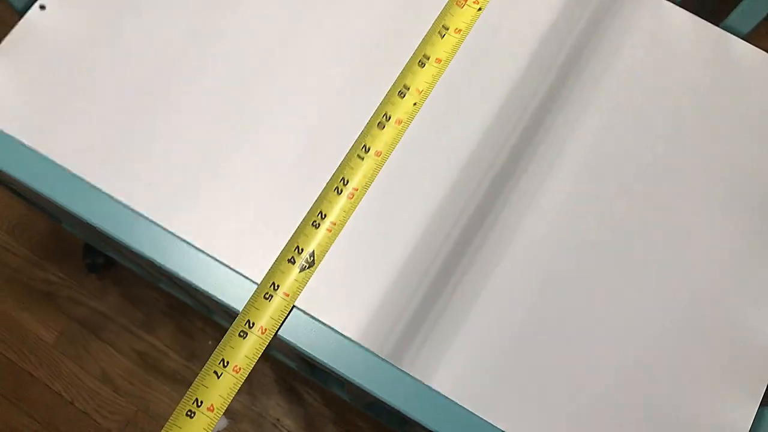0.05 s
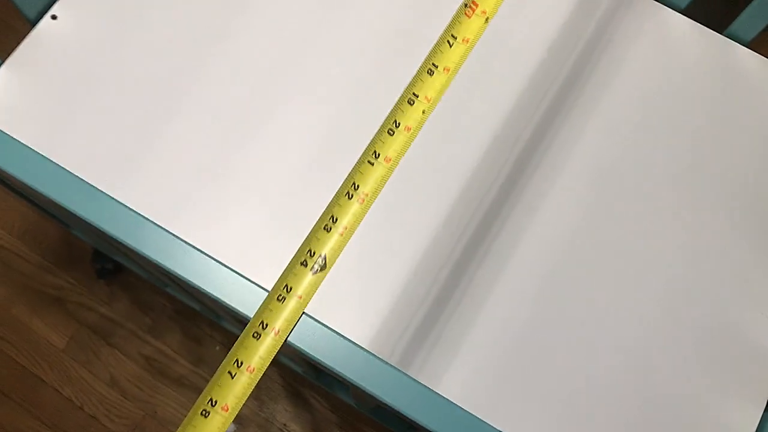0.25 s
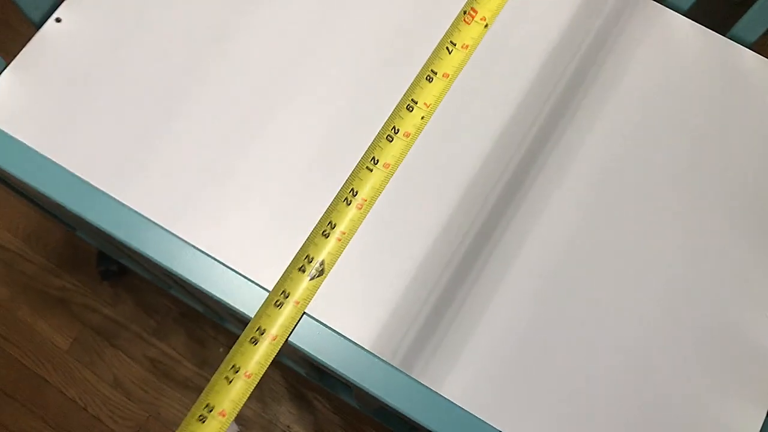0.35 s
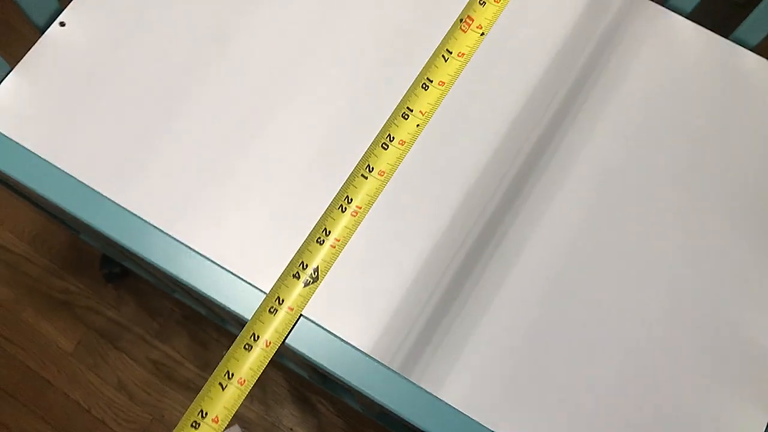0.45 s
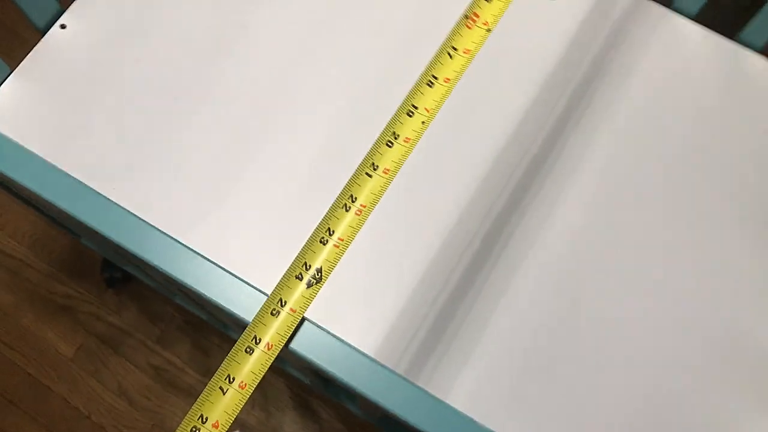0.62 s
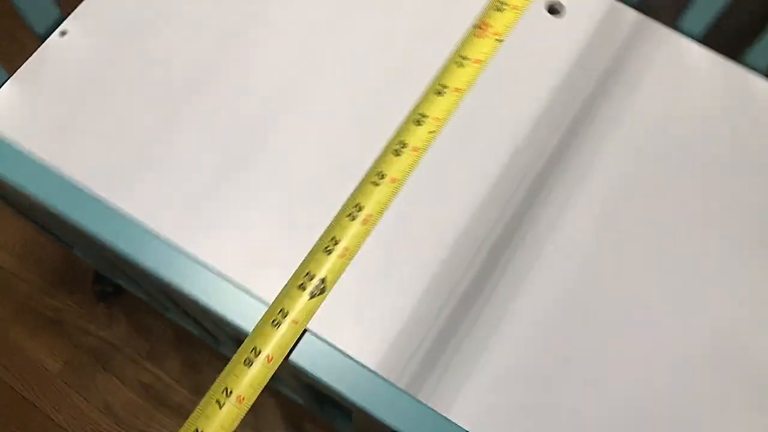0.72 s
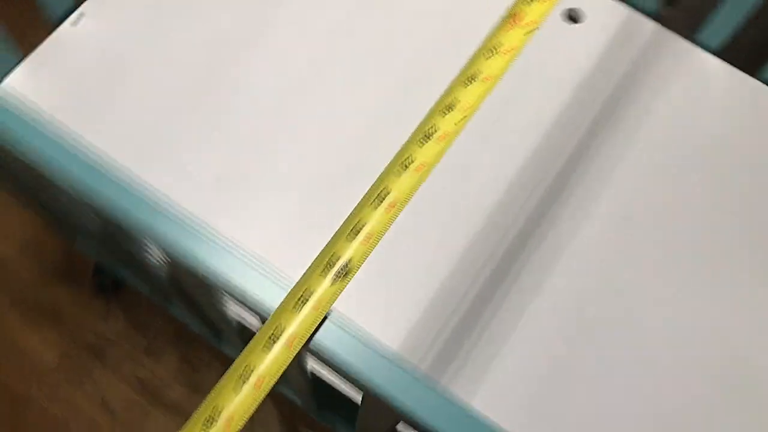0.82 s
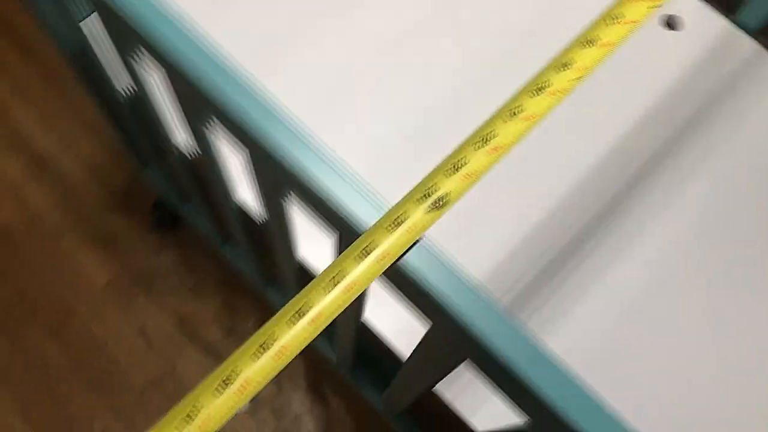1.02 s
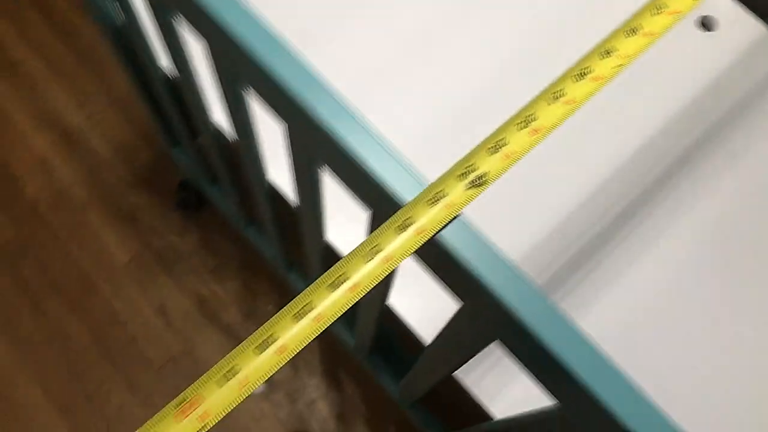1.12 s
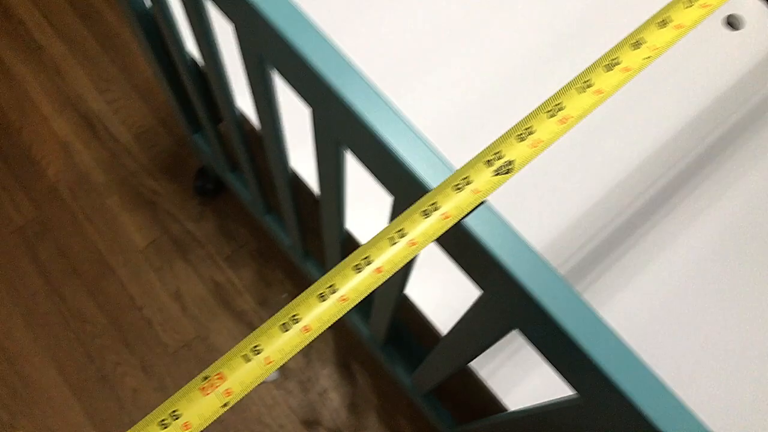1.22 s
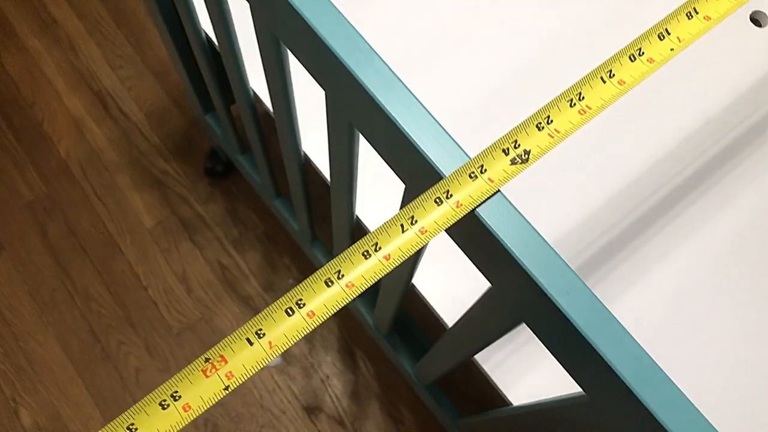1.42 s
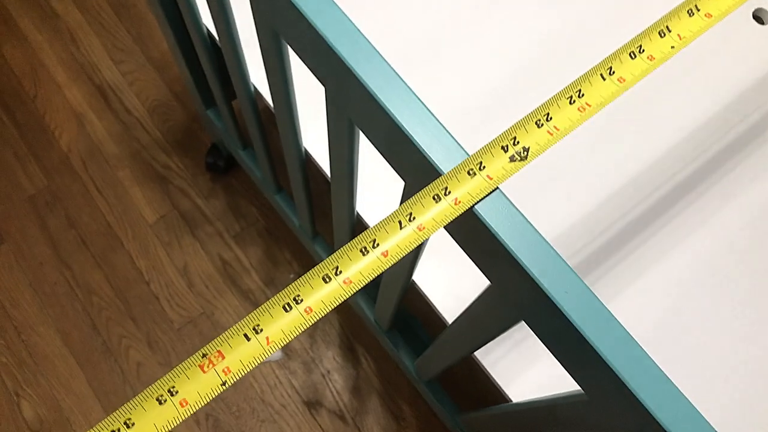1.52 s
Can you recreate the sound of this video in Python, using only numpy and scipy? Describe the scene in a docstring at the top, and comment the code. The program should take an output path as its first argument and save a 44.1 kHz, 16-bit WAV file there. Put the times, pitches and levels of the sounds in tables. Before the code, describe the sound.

Thin steel tape measure rattles, then clicks, scrapes and slides against a wooden rail.

```python
"""Steel tape measure on a wooden rail.

Close up in a quiet room, the thin blade buckles and clatters, then is stilled by a soft bump.
It clicks on the rail and scrapes along it with small ticks, and a short stick-slip rasp follows
as it is drawn out. Handling rumble and a faint electrical buzz lie underneath."""
import sys
import numpy as np
from scipy import signal
from scipy.fft import rfft, irfft, next_fast_len
from scipy.io import wavfile

SR = 44100
rng = np.random.default_rng(int(sys.argv[2]) if len(sys.argv) > 2 else 0)


def put_to_file(sound):
    """Save the sound as 16-bit audio at rate SR, in the file named by the first command-line argument."""
    columns = np.atleast_2d(sound).T  # one column per channel
    safe = np.clip(columns, -1, 1)
    whole_steps = np.round(safe * 32767)
    wavfile.write(sys.argv[1], SR, whole_steps.astype(np.int16))


N = 68355
T = np.arange(N) / SR


def amp(db):
    """Decibels to gain."""
    return 10 ** (np.asarray(db) / 20)


def unit(x):
    """Scale to rms 1."""
    return x / np.sqrt(np.mean(x ** 2) + 1e-20)


def curve_at(points, hz):
    """Read (frequency [Hz], value) points on a log frequency axis."""
    freqs, values = np.transpose(points)
    return np.interp(np.log(hz + 1), np.log(freqs), values)


def fader(points, t=T):
    """Gain over time from (time [s], level [dB]) points."""
    return amp(np.interp(t, *np.transpose(points)))


def filtered(x, response):
    """Apply a gain that depends on frequency."""
    size = next_fast_len(len(x) + 8192)
    return irfft(rfft(x, size) * response(np.fft.rfftfreq(size, 1 / SR)), size)[:len(x)]


def noise(spectrum, size=N):
    """Coloured noise of rms 1."""
    return unit(filtered(rng.standard_normal(size), lambda hz: amp(curve_at(spectrum, hz))))


def add(track, start, sound):
    """Mix a sound into the track at a start time in seconds."""
    i = max(round(start * SR), 0)
    track[i:i + len(sound)] += sound[:N - i]


def burst(spectrum, t60):
    """A crowd of modes struck at once, all dying at one speed."""
    t = T[:SR // 5]
    attack = 1 - np.exp(-t / 0.000078)
    return noise(spectrum, size=len(t)) * amp(-60 * t / t60) * attack


def ring(spectrum, decays):
    """A crowd of modes, each frequency dying at its own speed."""
    hz, t, bands = signal.stft(noise(spectrum, size=SR // 2), SR, nperseg=256)
    decay = amp(-60 * t / curve_at(decays, hz)[:, None])
    tail = signal.istft(bands * decay, SR, nperseg=256)[1]
    return tail * (1 - np.exp(-T[:len(tail)] / 0.00091))


def modes(table, waver_hz=18.3, wavers_per_s=70):
    """Struck modes of unit strength, each wavering in pitch as the blade bends."""
    t = T[:SR // 2]
    hz, db, t60 = np.transpose(table)[:, :, None]
    bends = rng.standard_normal((len(hz), 256))
    waver = waver_hz * np.array([np.interp(t * wavers_per_s, np.arange(256), bend) for bend in bends])
    cycles = np.cumsum(hz + waver, axis=1) / SR + rng.random(hz.shape)
    partials = amp(db - 60 * t / t60) * np.sin(2 * np.pi * cycles)
    attack = 1 - np.exp(-t / 0.0005)
    return partials.sum(0) / np.sqrt(np.sum(amp(db) ** 2) / 2) * attack


def snap(spectrum, travel_s=0.001, at_hz=4057):
    """One bending wave travelling along the blade: the treble runs ahead of the bass."""
    hz = np.fft.rfftfreq(SR // 10, 1 / SR)
    lag_cycles = 2 * travel_s * np.sqrt(at_hz * hz)
    wave = irfft(amp(curve_at(spectrum, hz)) * np.exp(-2j * np.pi * lag_cycles))
    return wave * np.linspace(1, 0, len(wave)) / np.abs(wave).max()


# colour of the room tone (frequency [Hz], gain [dB])
AIR_EQ = [(30, 8), (95, 14.5), (135, 7), (200, -0.5), (300, 2.5), (400, -3.5), (720, -10), (1000, -8),
          (1250, -13.5), (1800, -2.5), (2200, -22.5), (3000, -15), (4500, -21.5), (6500, -15.5),
          (10300, -27.5), (12000, -23), (15500, -26)]
# steady hum tones (frequency [Hz], level [dB])
HUM_TONES = [(323, -88), (398, -72.5)]


def room_tone():
    """A bed of quiet air and faint hum."""
    hum = sum(amp(db) * np.sin(2 * np.pi * hz * T) for hz, db in HUM_TONES)
    return amp(-60.5) * noise(AIR_EQ) + hum


# colour of the buzz's spits (frequency [Hz], gain [dB])
SPIT_EQ = [(1000, 2), (3000, -1.5), (4600, -9), (5400, 8), (6600, -3.5), (7600, -20), (10000, -24.5),
           (15000, -8)]


def mains_buzz(mains_hz=60, spit_width_s=0.00083, whine_hz=8360, whine_lag_s=0.014):
    """One spit of noise in every mains cycle, and a rough whine that pulses with it."""
    from_spit = ((T * mains_hz + 0.5) % 1 - 0.5) / mains_hz
    spits = np.exp(-(from_spit / spit_width_s) ** 2 / 2) * noise(SPIT_EQ)
    phase_jitter = 0.5 * noise([(150, 1.5), (2000, -72)])
    whine = unit(np.sin(2 * np.pi * whine_hz * T + phase_jitter))
    pulsing = np.clip(0.62 + np.cos(2 * np.pi * mains_hz * (T - whine_lag_s)), 0, 1)
    return amp(-62.5) * spits + amp(-77) * whine * pulsing


# swells of the deep rumble and of the hand's rub (time [s], level [dB])
RUMBLE_FADER = [(0, -43.5), (.1, -48.5), (.16, -57.5), (.3, -46), (.45, -58.5), (.52, -38), (.61, -54.5),
                (.68, -33.5), (.74, -53), (.83, -42), (.96, -42.5), (1.09, -48.5), (1.2, -49.5),
                (1.29, -45), (1.55, -52.5)]
RUB_FADER = [(0, -93), (.44, -86), (.52, -71), (.61, -62.5), (.66, -60), (.75, -74.5), (.86, -58),
             (.885, -43.5), (.94, -56), (.98, -44), (1.025, -50), (1.045, -66.5), (1.55, -75)]
# their colours (frequency [Hz], gain [dB])
RUMBLE_EQ = [(15, -8.5), (28, 0.5), (43, 2), (60, 1), (80, -15.5), (130, -21), (200, -45.5), (500, -64)]
RUB_EQ = [(50, -3.5), (130, -0.5), (200, -4.5), (330, -6.5), (500, -19.5), (750, -25), (2000, -55)]


def handling():
    """The moving hand rumbles and rubs near the microphone."""
    return fader(RUMBLE_FADER) * noise(RUMBLE_EQ) + fader(RUB_FADER) * noise(RUB_EQ)


# swell of the scrape (time [s], level [dB])
SCRAPE_FADER = [(0, -73), (.17, -74.5), (.22, -65), (.42, -60.5), (.45, -48.5), (.5, -55.5), (.55, -57),
                (.61, -57.5), (.7, -63.5), (.79, -70.5), (.9, -68), (1, -79.5), (1.55, -78.5)]
# its broad colour (frequency [Hz], gain [dB])
SCRAPE_EQ = [(200, 0), (800, -12), (1600, -3.5), (2300, -3), (3100, -6.5), (3700, -6), (4600, -3.5),
             (5600, 0), (7000, -20), (10000, -30), (15000, -34)]
# resonances of the resting blade (frequency [Hz], width [Hz], boost [dB])
SCRAPE_PEAKS = [(1550, 15, 20.5), (1790, 57, 2), (3580, 81, 15), (4230, 58, 6)]


def scrape(grains_per_s=7400, spread_db=2.5):
    """Dense friction grains excite the blade as its edge slides on the rail."""
    def body(hz):
        peaks = sum(db / (1 + (2 * (hz - centre) / width) ** 2) for centre, width, db in SCRAPE_PEAKS)
        return amp(curve_at(SCRAPE_EQ, hz) + peaks)

    grains = (rng.random(N) < grains_per_s / SR) * rng.standard_normal(N)
    grains *= amp(spread_db * rng.standard_normal(N))
    return fader(SCRAPE_FADER) * unit(filtered(grains, body))


# light touches on the rail (time [s], level [dB], brightness [dB/octave])
TICK_CUES = [(0.057, -59.5, 11), (0.0793, -53, 5.5), (0.4716, -41, 3.5), (0.5312, -43, 0.5),
             (0.536, -65, -15), (.5607, -55, -22), (0.5874, -47, -4.5), (.621, -51, 15), (.670, -56, 5),
             (0.7237, -52, -2), (1.0971, -56, -10), (1.1, -58.5, 16), (1.282, -62.5, -7),
             (1.338, -57, -11.5)]
# a tick's colour before its tilt (frequency [Hz], gain [dB])
TICK_EQ = [(200, -34), (900, -13.5), (1600, 2.5), (2600, -1), (3700, 6), (4600, 1.5), (5600, -2.5),
           (6600, -9), (10000, -38), (15000, -45)]


def ticks():
    """The blade touches the rail lightly: each tick is a short hit with a softer tail."""
    out = np.zeros(N)
    for start, db, tilt in TICK_CUES:
        colour = [(hz, band_db + tilt * np.log2(hz)) for hz, band_db in TICK_EQ]
        add(out, start, amp(db) * (burst(colour, t60=0.042) + amp(-13.5) * burst(colour, t60=0.2)))
    return out


# hits of the buckling blade (time [s], blade level [dB], rail knock level [dB])
CLATTER_CUES = [(0.2307, -19.5, -37), (0.2329, -19, -30.5), (0.2369, -24, -26.5), (0.2403, -21, -35),
                (0.2463, -32.5, -52), (0.2661, -25.5, -32.5), (0.2729, -33.5, -40), (.291, -33, -52),
                (0.3065, -30.5, -58), (0.3286, -45.5, -45.5), (0.387, -48, -64)]
# modes of the free blade and of the knock on the rail (frequency [Hz], gain [dB], t60 [s])
BLADE_MODES = [(3627, -5.5, 0.49), (3845, 1, 0.11), (3920, -17, .35), (4087, 7.5, 0.16), (4157, -2, 0.31),
               (4570, -10, 0.21), (4690, -8, 0.2), (4753, -14, 0.31), (4800, 2, 0.16), (5370, 0.5, 0.31),
               (5650, -15, .3), (5840, 0, 0.15), (6912, 2.5, .2), (8000, -17, .25)]
KNOCK_MODES = [(333, -32, 0.083), (480, -13.5, 0.17), (1293, -12.5, .3), (1360, -13.5, 0.059),
               (1716, 4.5, 0.033), (1715, 4, 0.06), (1780, -2.5, 0.047), (2400, -0.5, 0.046),
               (3034, 11, 0.033), (3130, -2, 0.088)]
# colours of the opening crack and of the shimmer of weaker modes (frequency [Hz], gain [dB])
CRACK_EQ = [(200, -17.5), (450, -10), (900, -21.5), (1600, -12), (2600, -9), (4200, 0.5), (6500, 2.5),
            (8000, -8), (10500, -15), (12500, -11.5), (15500, -21)]
SHIMMER_EQ = [(90, -20.5), (140, -9.5), (220, -26.5), (450, -26.5), (850, -22), (1600, -12), (2300, -15),
              (3300, -9.5), (4000, -5.5), (5300, 3.5), (6600, -7), (7600, -9), (9600, -16.5),
              (10500, -26.5), (12500, -24.5), (15500, -31)]
# how long the shimmer hangs on (frequency [Hz], t60 [s])
SHIMMER_DECAY = [(200, 0.64), (1500, 0.4), (5000, 0.3), (9000, 0.28), (15000, 0.37)]


def clatter(settle_at_s=0.35, settle_length_s=0.04, settle_db=-3.5):
    """Every hit cracks, knocks the rail and rings the thin steel anew, damped as the blade settles."""
    out = np.zeros(N)
    for start, db, knock_db in CLATTER_CUES:
        add(out, start, amp(db - 9) * modes(BLADE_MODES))
        add(out, start, amp(knock_db) * modes(KNOCK_MODES))
        add(out, start, amp(db + 1.5) * snap(CRACK_EQ))
        add(out, start, amp(db) * burst(CRACK_EQ, t60=0.025))
        add(out, start, amp(db - 9) * ring(SHIMMER_EQ, SHIMMER_DECAY))
    settled = np.clip((T - settle_at_s) / settle_length_s, 0, 1)
    return out * amp(settle_db * settled)


# jolts that set the blade flapping (time [s], level [dB], pitch [Hz])
FLAP_CUES = [(.24, -47.5, 158), (0.489, -44.5, 148.2)]


def flaps(rise_s=0.017, t60=0.36):
    """The long free blade swings after a jolt: a low tone that swells and dies."""
    out = np.zeros(N)
    swell = 1 - np.exp(-T / rise_s)
    for start, db, hz in FLAP_CUES:
        add(out, start, amp(db - 60 * T / t60) * swell * np.sin(2 * np.pi * hz * T))
    return out


# soft bumps (time [s], level [dB], pitch [Hz], width [s])
BUMP_CUES = [(0.3587, -25, 352, 0.0008), (.366, -34.5, 67, 0.0053), (0.9517, -50, 1000, 0.0013),
             (1.031, -33, 94, 0.0041), (1.098, -54.5, 245, 0.0028), (1.339, -43.5, 900, 0.00023),
             (1.4785, -52.5, 950, 0.00058)]


def bumps():
    """Soft contacts: a push of a cycle or two with no ring."""
    out = np.zeros(N)
    for centre, db, hz, width in BUMP_CUES:
        t = T - centre
        out -= amp(db) * np.exp(-(t / width) ** 2 / 2) * np.cos(2 * np.pi * hz * t)
    return out


# colours of the click's attack and of its tail (frequency [Hz], gain [dB])
CLICK_EQ = [(200, -29), (1000, -16), (1800, -9.5), (3000, -13.5), (3600, 3), (4400, 6.5), (4900, -8),
            (5400, 1), (6900, 0), (7500, -15), (8300, -5), (9000, -10.5), (9600, -13), (10700, -19.5),
            (14000, -13.5), (15500, -27)]
CLICK_TAIL_EQ = [(120, -3), (400, -0.5), (1000, 2), (1800, -4), (2500, -3), (4000, 10), (6500, 5.5),
                 (9000, -13), (15000, -18)]
# how long the tail rings (frequency [Hz], t60 [s])
CLICK_TAIL_DECAY = [(200, 0.52), (1500, 0.25), (4500, 0.11), (9000, 0.12), (15000, .08)]


def click(start=0.4239):
    """One sharp click of the blade that rings the rail."""
    out = np.zeros(N)
    add(out, start, amp(-15.5) * snap(CLICK_EQ))
    add(out, start, amp(-27) * burst(CLICK_EQ, t60=0.03))
    add(out, start, amp(-33) * ring(CLICK_TAIL_EQ, CLICK_TAIL_DECAY))
    return out


# strength of the slips through the rasp (time [s], level [dB])
SLIP_FADER = [(.802, -49.5), (.83, -48), (.849, -46.5), (.859, -52.5), (.872, -62)]
# colour of one slip (frequency [Hz], gain [dB])
SLIP_EQ = [(200, -8), (430, 7.5), (700, -12), (1450, 3.5), (2400, -12.5), (3300, -3.5), (3900, 5.5),
           (4800, -3), (5700, 4.5), (6900, -0.5), (7600, -12), (8600, -9), (10500, -26), (12000, -17),
           (15000, -24)]


def rasp(start=0.802, end=0.872, slip_hz=151.9, rise_hz_per_s=1100, likeness=0.86):
    """The blade sticks and slips ever faster as it is drawn out; each slip rings much like the last."""
    def slip():
        return burst(SLIP_EQ, t60=0.015) + amp(-12) * burst(SLIP_EQ, t60=0.13)

    out = np.zeros(N)
    t = T[:round((end - start) * SR)]
    slip_count = np.floor(slip_hz * t + rise_hz_per_s * t ** 2 / 2)
    shared = slip()
    for onset in start + t[np.diff(slip_count, prepend=-1) > 0]:
        blend = np.sqrt(likeness) * shared + np.sqrt(1 - likeness) * slip()
        add(out, onset, fader(SLIP_FADER, onset) * blend)
    return out


def scene():
    """The mono mix: the blade over a bed of room and hand noise."""
    bed = room_tone() + mains_buzz() + handling()
    blade = scrape() + ticks() + clatter() + flaps() + bumps() + click() + rasp()
    return (bed + blade)[None]


def record(dry, cutoff_hz=15850):
    """A brick-wall low-pass takes off the very top."""
    return np.array([filtered(channel, lambda hz: hz < cutoff_hz) for channel in dry])


dry = scene()
out = record(dry)
put_to_file(out)
```